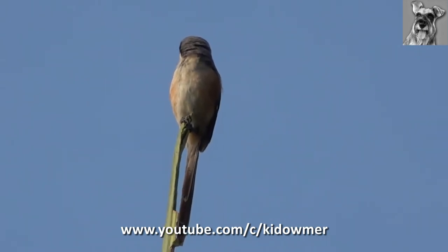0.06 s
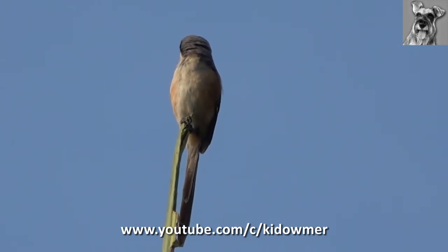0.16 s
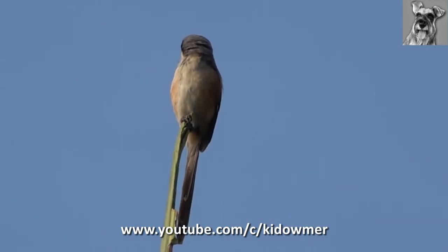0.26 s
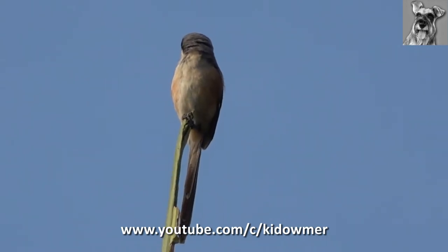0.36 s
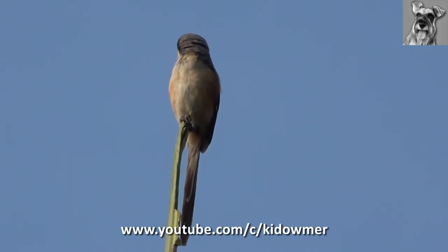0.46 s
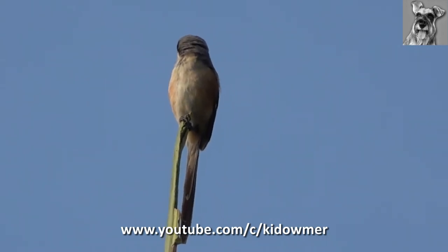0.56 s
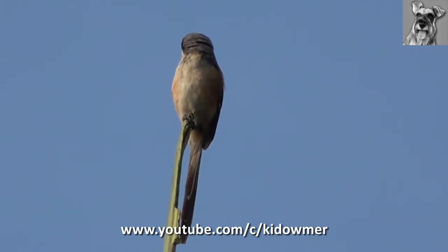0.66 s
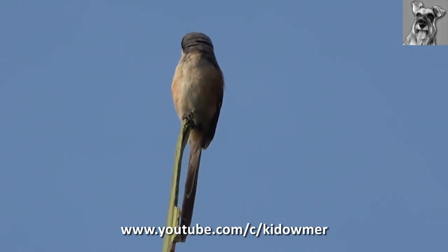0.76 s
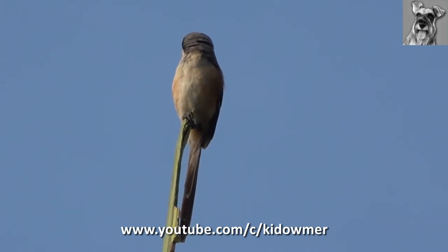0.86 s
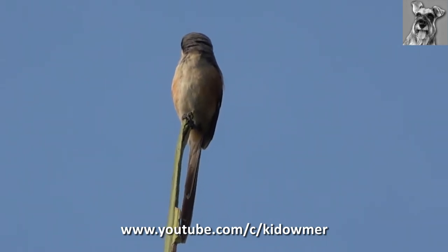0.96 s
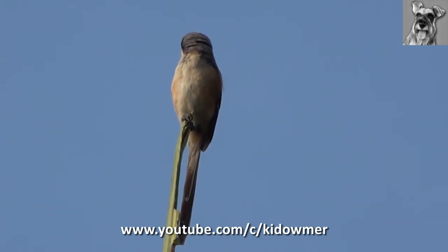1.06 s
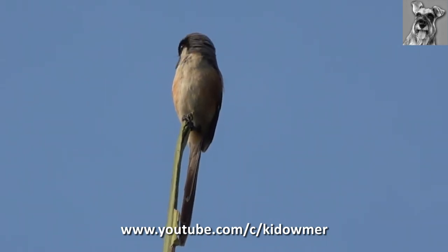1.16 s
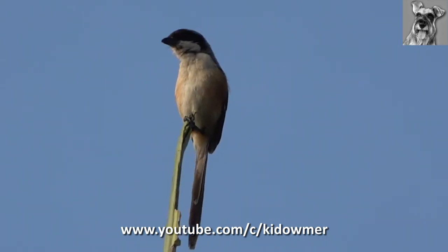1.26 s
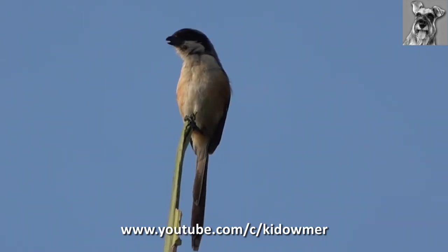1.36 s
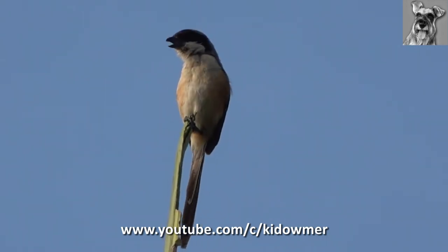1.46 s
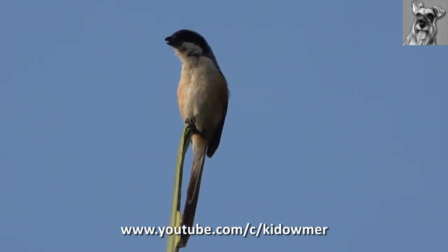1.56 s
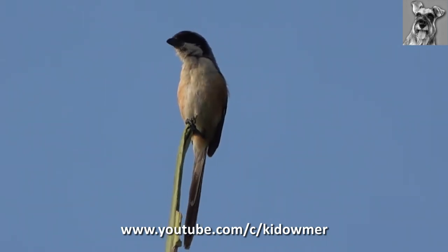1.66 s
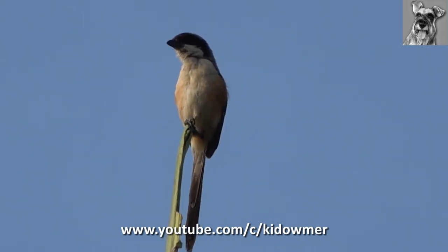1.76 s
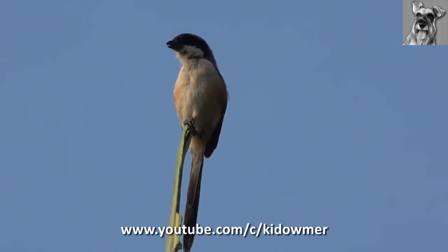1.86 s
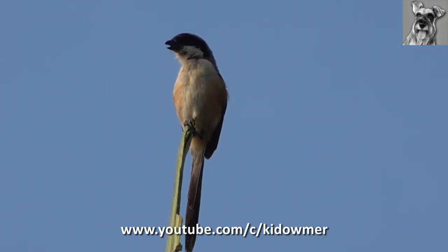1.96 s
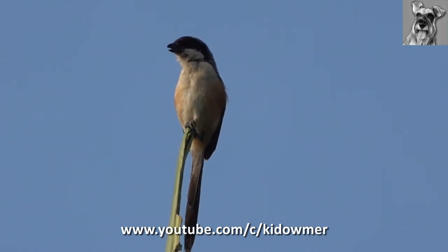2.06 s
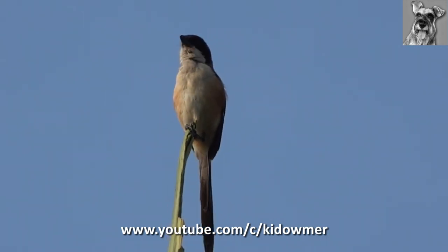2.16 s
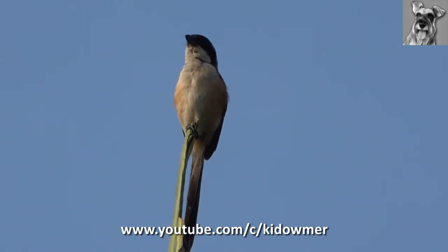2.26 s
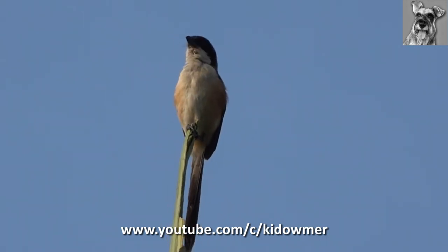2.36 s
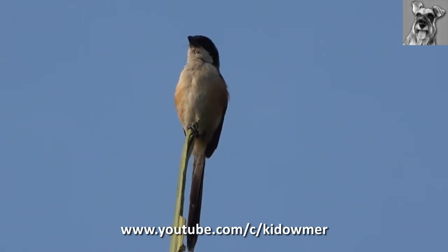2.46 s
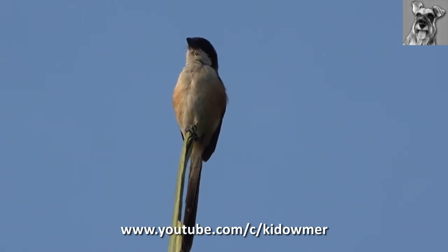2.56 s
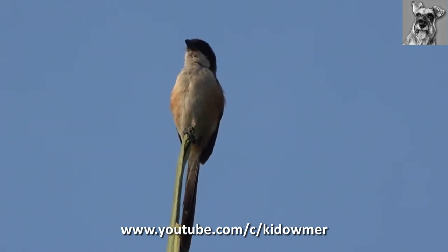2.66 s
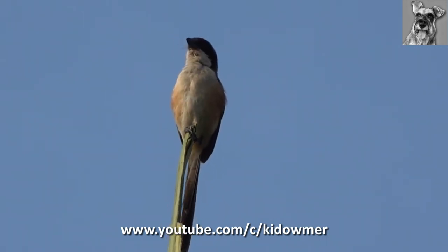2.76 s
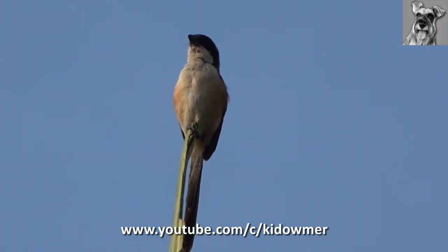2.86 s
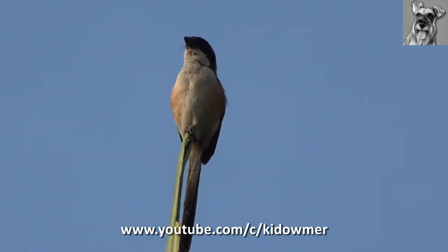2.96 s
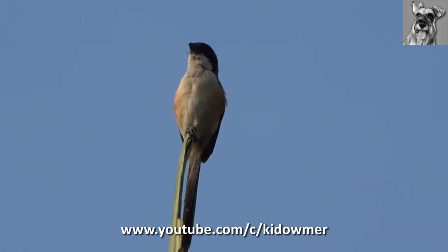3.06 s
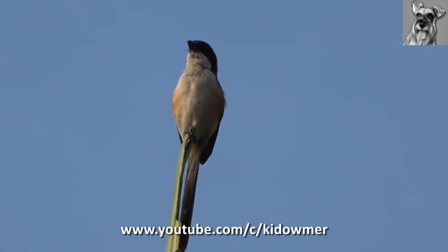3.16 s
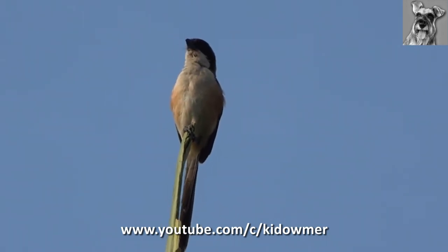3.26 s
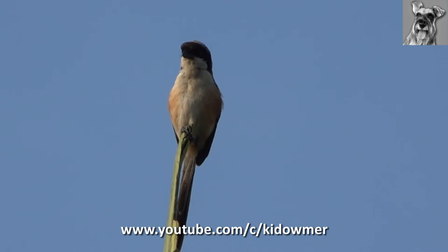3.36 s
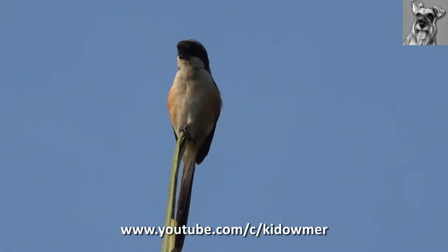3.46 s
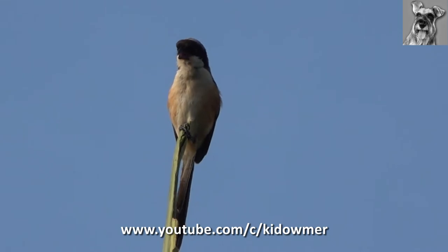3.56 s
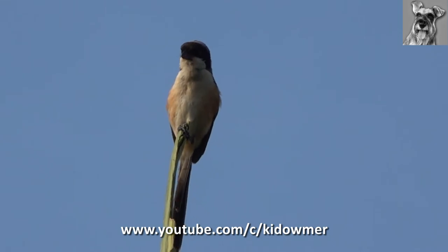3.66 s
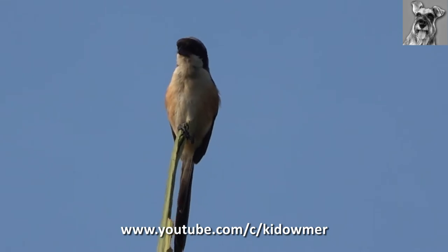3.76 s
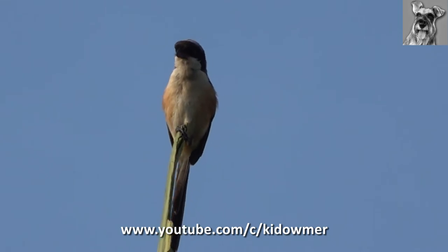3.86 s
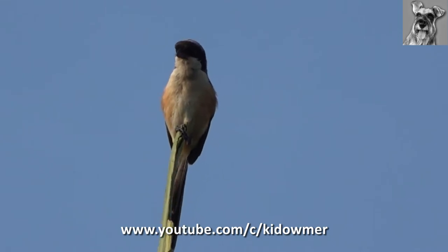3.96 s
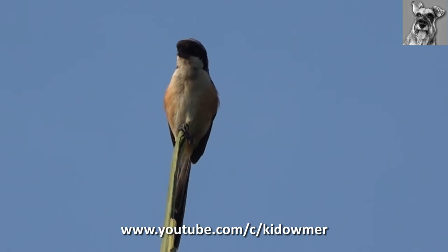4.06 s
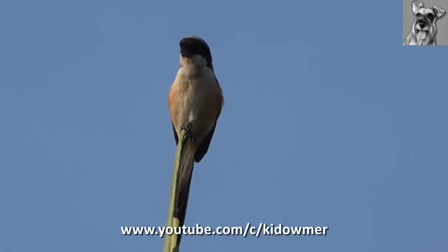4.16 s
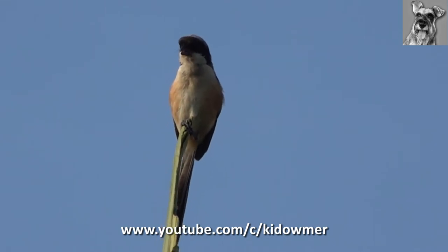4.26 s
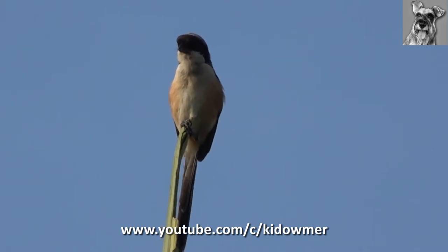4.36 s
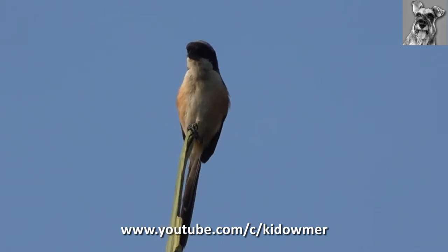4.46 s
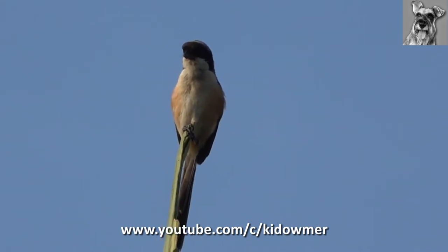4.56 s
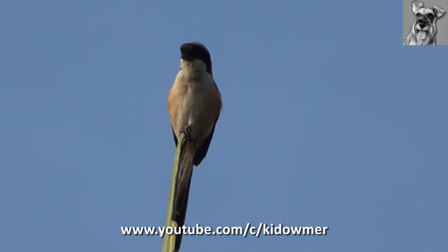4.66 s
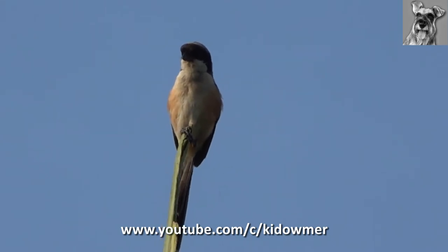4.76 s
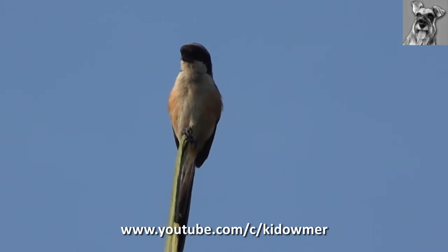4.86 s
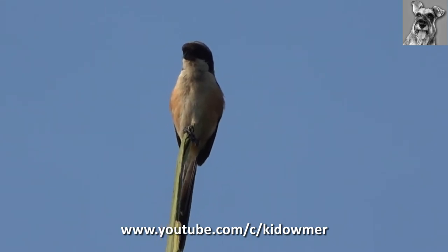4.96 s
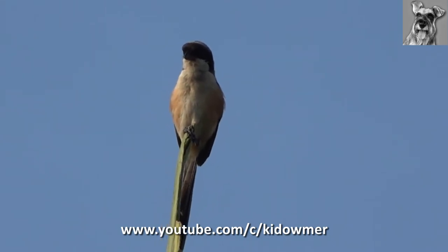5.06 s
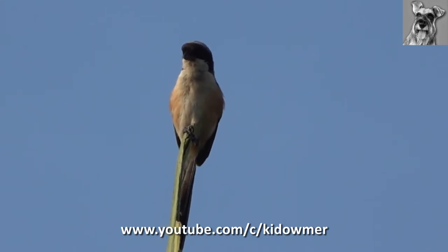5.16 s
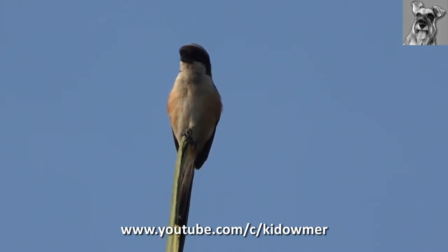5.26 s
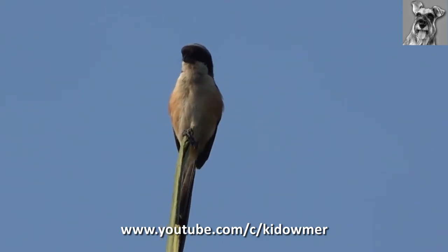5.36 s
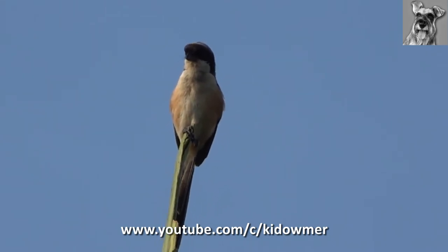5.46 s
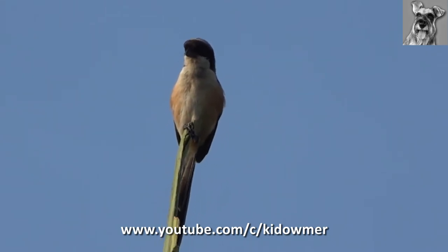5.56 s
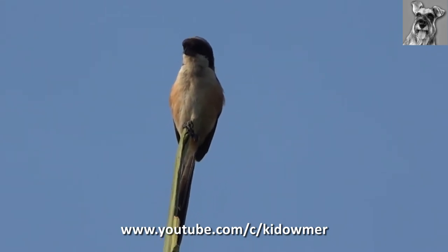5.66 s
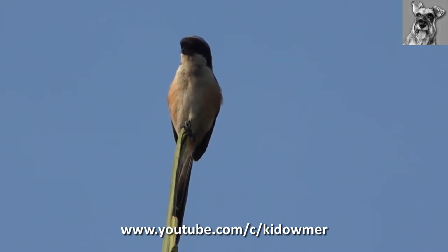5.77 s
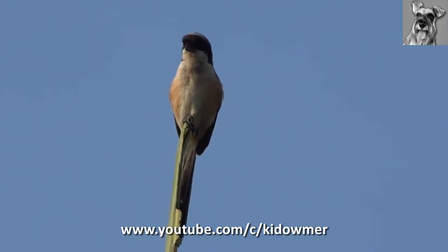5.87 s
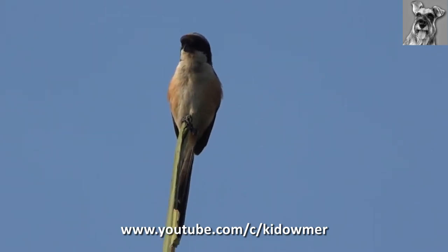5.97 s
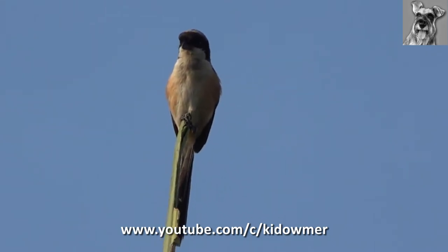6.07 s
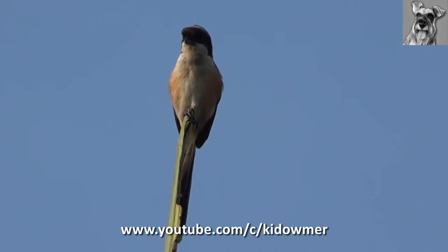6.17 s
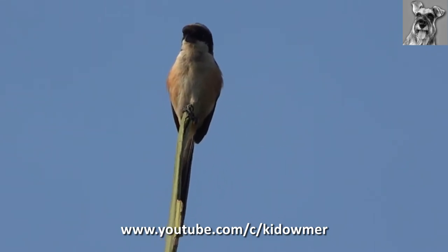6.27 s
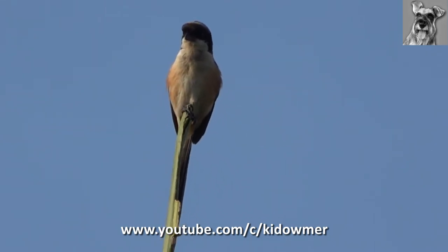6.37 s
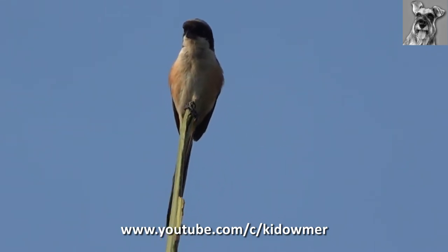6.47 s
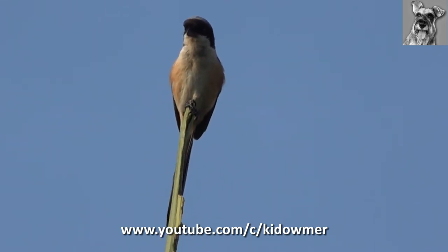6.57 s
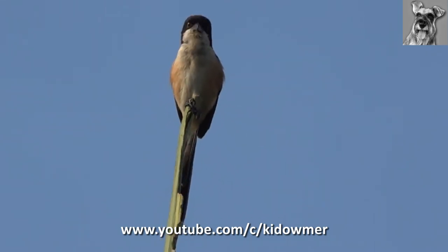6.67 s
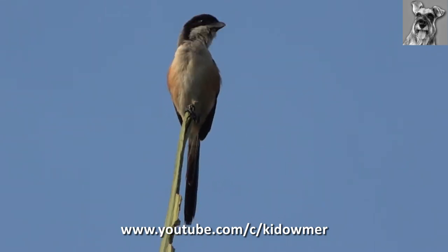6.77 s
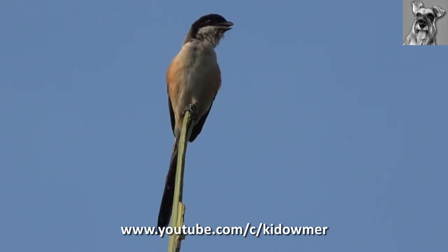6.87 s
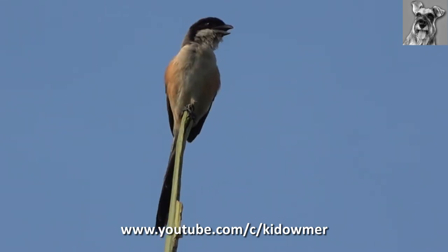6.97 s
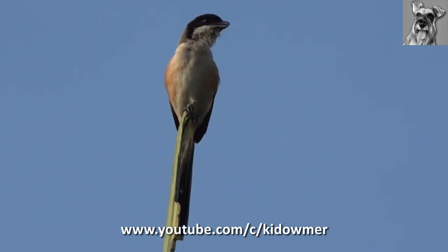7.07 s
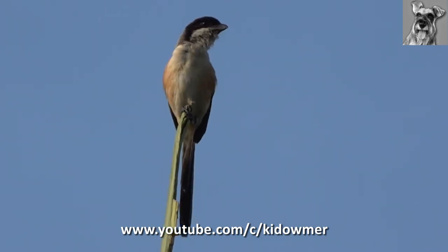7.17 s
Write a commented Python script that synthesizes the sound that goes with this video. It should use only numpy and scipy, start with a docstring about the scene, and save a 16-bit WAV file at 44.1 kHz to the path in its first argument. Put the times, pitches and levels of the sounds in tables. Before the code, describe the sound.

A perched shrike calls five times in a hoarse, scratchy voice: a pair, a second pair, then one last call near the end. It stands out clearly in front of the microphone, with a soft scatter of echoes from the trees. Behind it runs an unbroken, high cicada drone, with faint trills and chirps from distant small birds and a soft wash of far-off traffic.

```python
"""Cicadas drone steadily in the trees over a faint hiss and the low hush of distant traffic.
Small far voices trill and chirp; then a shrike on a high perch gives five harsh, rasping calls,
two pairs and a single one. The drone is resonance: bursts of tymbal clicks ring hollow bodies.
The far voices are frequency-modulated tones. The shrike's voice and breath are both chopped by
a fast flutter, and the foliage scatters every bird's sound into echoes."""
import sys
import numpy as np
from scipy import signal
from scipy.fft import rfft, irfft
from scipy.io import wavfile

SR = 44100
rng = np.random.default_rng(int(sys.argv[2]) if len(sys.argv) > 2 else 0)


def store_pcm(level_fs):
    """Save levels as 16-bit WAV."""
    pcm = np.round(np.clip(level_fs, -1, 1) * 32767).astype(np.int16)
    wavfile.write(sys.argv[1], SR, np.atleast_2d(pcm).T)


N = 318843
FREQS = np.fft.rfftfreq(N, 1 / SR)

# cicada bands: (resonance [Hz], width [Hz], level [dB], burst rate [Hz], pulsing depth [0-1])
CICADAS = [(10620, 970, -46.5, 133.3, 0.21), (10820, 1010, -47, 130, 0.01), (9384, 570, -55.5, 82, 0.15),
           (6573, 503, -62.5, 62, 0.24), (4667, 460, -68, 78, 0.45)]
# spectra of traffic hush, low rumble and high hiss: (frequency [Hz], relative density [dB])
HUSH_SPECTRUM = [(100, -32), (260, -18), (330, -12), (440, -10), (600, -4.5), (800, -1), (1000, .5),
                 (1300, -5), (1600, -10), (2100, -19.5), (3100, -34), (5000, -84)]
RUMBLE_SPECTRUM = [(15, -36), (40, -20), (60, -6.5), (95, 0.5), (160, 0), (210, -6), (300, -24), (600, -70)]
HISS_SPECTRUM = [(1500, -5), (2400, 0.5), (4000, -1.5), (5600, -8.5), (7900, -16.5), (9500, 14.5),
                 (12200, 4), (13000, -19), (13900, -17), (15000, -42)]
# slow drift of the rumble: (time [s], level [dB])
RUMBLE_LEVELS = [(0, -71), (1.25, -67.3), (2.4, -71), (5, -68), (5.9, -71.5), (7.0, -67.5)]
# likeness of the background at left and right: (frequency [Hz], coherence [0-1])
COHERENCE = [(130, 0.9), (290, .98), (640, .96), (1410, .96), (3100, 0.8), (6820, 0.92), (11000, 0.96),
             (13000, 1)]
# balance of the background: (frequency [Hz], left minus right [dB])
BALANCE = [(300, 0), (640, 0), (1400, 1.3), (6800, 1.5), (11000, 1.45), (13000, -0.5)]
# phase of the background: (frequency [Hz], lead of the left [rad])
PHASE_LEAD = [(5000, 0.0071), (10500, -.17), (13000, 0)]
# a lower and a higher far singer: (start [s], end [s], centre [Hz], reference level [dB])
TRILLS = [(.3, .89, 4605, -60.5), (.62, 1.042, 4830, -59), (1.65, 2.0, 4860, -56), (2.75, 3.17, 4550, -62),
          (2.8, 3.151, 4920, -59), (3.7, 4.137, 4880, -60), (3.85, 4.203, 4570, -56),
          (4.55, 5.167, 4830, -58), (4.95, 5.33, 4550, -59), (5.72, 6.173, 4850, -58),
          (5.9, 6.344, 4580, -58), (6.95, 7.295, 4780, -55)]
# far chirps: (start [s], length [s], first pitch [Hz], last pitch [Hz], peak level [dB])
CHIRPS = [(.945, .035, 3850, 3400, -66), (1.004, .23, 4140, 3830, -67.5), (1.188, 0.054, 3500, 3230, -66),
          (1.257, 0.036, 3430, 3880, -61.5), (1.73, 0.031, 3900, 4250, -59), (2.16, 0.037, 4100, 3710, -59),
          (5.485, .04, 4100, 3800, -64), (5.805, 0.046, 4100, 3500, -61), (5.876, .025, 2900, 3100, -65),
          (5.892, .028, 3660, 3420, -59.5)]
# shrike calls: (start [s], length [s], effort [dB], nominal top of the fourth harmonic [Hz],
# third harmonic [dB re effort], fourth harmonic [dB re effort], split onset [s], split length [s])
SHRIKE_CALLS = [ (1.375, 0.24, -39, 4534, -1.5, -6.5, 0.057, .05),
                (1.873, 0.24, -40, 4530, -3, -6, 0.11, 0.12), (3.456, .233, -40, 4510, -5, -5.5, 0.15, .12),
                (4.112, 0.22, -40, 4520, -6, -6.5, 0.116, 0.11),
                (6.868, .237, -39.5, 4500, -4.5, -2.5, 0.11, .12), ]
# weak partials of the voice: (frequency [multiple of the pitch], level [dB re effort])
OVERTONES = [(2.03, -27), (6.12, -21), (7.26, -26), (12.2, -39)]
# partials that grow as the voice splits into strong and weak cycles:
# (frequency [multiple of the pitch], relative level [dB])
SPLIT_PARTIALS = [(2.68, -5.5), (3.418, -3.5), (4.467, -3)]
# spectrum of the rasping breath: (frequency [Hz], relative density [dB])
RASP_SPECTRUM = [(1000, -26), (1750, -13), (2150, -11.5), (2700, -2.5), (3300, -3), (4100, -4.5),
                 (5000, -6.5), (5500, -8.5), (7000, -9.5), (7700, -9.5), (9200, -4), (12400, -20.5),
                 (13300, -7.5), (15700, -23)]
# decay of scatter from near leaves and of echo from the trees: (frequency [Hz], time to fall 60 dB [s])
LEAF_DECAY = [(2000, 0.48), (14000, 0.43)]
TREE_DECAY = [(1500, 0.56), (4000, 1), (8000, 1), (14000, 0.49)]


def gain_of(db):
    """Amplitude grows tenfold with every 20 decibels."""
    return 10 ** (np.asarray(db) / 20)


def unit_rms(x):
    """Normalisation to unit mean power."""
    return x / np.sqrt(np.mean(np.abs(x) ** 2) + 1e-20)


def read(table, hz):
    """Interpolation on a log-frequency axis."""
    f, value = np.transpose(table)
    return np.interp(np.log(hz + 1), np.log(f + 1), value)


def add(mix, start, sound):
    """Superposition: a sound joins the mix at its start time in seconds."""
    part = mix[max(round(start * SR), 0):][:len(sound)]
    part += sound[:len(part)]


def wander(size, rate_hz):
    """Low-passed noise: a smooth random fluctuation of rms 1."""
    f = np.fft.rfftfreq(size, 1 / SR)
    lowpass = np.exp(-.5 * (f / rate_hz) ** 2) * (f > 0)
    return unit_rms(irfft(rfft(rng.standard_normal(size)) * lowpass, size))


def coloured(x, spectrum):
    """Linear filtering imposes a tabulated spectrum; the result has rms 1."""
    size = x.shape[-1]
    response = gain_of(read(spectrum, np.fft.rfftfreq(size, 1 / SR)))
    return unit_rms(irfft(rfft(x) * response, size))


def cicada(hz, width, db, burst_hz, pulsing):
    """Resonance: bursts of tymbal clicks ring a hollow body, and many animals blur into one band."""
    beat = 2 * np.pi * np.cumsum(burst_hz * (1 + .0084 * wander(N, 3.5))) / SR
    bursts = rng.standard_normal((2, N)) * (1 + pulsing * np.cos(beat))
    body = (1 + ((FREQS - hz) / width) ** 2) ** -2.2
    return gain_of(db + .25 * wander(N, 5)) * unit_rms(irfft(rfft(bursts) * body, N))


def traffic(hush_db=-55.5):
    """Incoherent summation: distant traffic and air merge into a low rumble and a hush."""
    rumble_db = np.interp(np.arange(N) / SR, *np.transpose(RUMBLE_LEVELS))
    rumble = gain_of(rumble_db) * coloured(rng.standard_normal(N), RUMBLE_SPECTRUM)
    drift = gain_of(hush_db + .21 * wander(N, .95))
    return rumble, drift * coloured(rng.standard_normal((2, N)), HUSH_SPECTRUM)


def high_hiss(db=-62):
    """Leaves and far insects add incoherently to a steady, faint noise."""
    return gain_of(db) * coloured(rng.standard_normal((2, N)), HISS_SPECTRUM)


def spread(pair):
    """Partial coherence: two unrelated signals become one wide source at two close microphones."""
    left, unrelated = rfft(pair)
    coherence = np.clip(read(COHERENCE, FREQS), 0, 1)
    right = coherence * left + np.sqrt(1 - coherence ** 2) * unrelated
    tilt = gain_of(read(BALANCE, FREQS) / 2) * np.exp(.5j * read(PHASE_LEAD, FREQS))
    return irfft([left * tilt, right / tilt], N)


def trill(start, end, hz, reference_db, rate_hz=23.3, sweep_hz=248, rise_db=9):
    """Frequency modulation: a thin whistle swings ever wider and louder up to its midpoint."""
    t = np.arange(0, end - start, 1 / SR)
    grown = np.minimum(2 * t / (end - start), 1)
    swing = np.cos(2 * np.pi * rate_hz * (t - t[-1] + .02) + .21 * wander(len(t), 8.8))
    pitch = hz + sweep_hz * (.4 + .6 * grown) * swing + 75 * wander(len(t), 300)
    accent = .45 + swing ** 2  # loudest at the turns
    whistle = unit_rms(accent * np.sin(2 * np.pi * np.cumsum(pitch) / SR))
    level_db = reference_db - rise_db * (2 - grown)  # settles rise_db below the reference
    return gain_of(level_db) * whistle * signal.windows.tukey(len(t), .1)


def chirp(length, first_hz, last_hz, db):
    """A linear glide: frequency jitter makes a far bird's slurred note slightly hoarse."""
    size = int(length * SR)
    pitch = np.linspace(first_hz, last_hz, size) + 140 * wander(size, 400)
    return gain_of(db) * np.sin(2 * np.pi * np.cumsum(pitch) / SR) * signal.windows.tukey(size, .7)


def placed(x, lead_s=3e-6, louder_db=.4):
    """Path difference: a source just left of centre reaches that side sooner and louder."""
    tilt = gain_of(louder_db / 2) * np.exp(1j * np.pi * FREQS * lead_s)
    return irfft(rfft(x) * np.array([tilt, 1 / tilt]), N)


def foliage(x, decay, dull_hz, echoes_per_s=2500):
    """Scattering: foliage returns many small echoes, the highest treble dying first."""
    taps = rng.standard_normal((2, SR)) * (rng.random((2, SR)) < echoes_per_s / SR)
    taps[1] = .8 * taps[0] + .6 * taps[1]  # the two sides are partly alike
    hz, t, spectra = signal.stft(taps, SR, nperseg=256)
    fade = gain_of(-60 * t / read(decay, hz)[:, None]) / (1 + (hz[:, None] / dull_hz) ** 2)
    tail = signal.istft(spectra * fade, SR, nperseg=256)[1]
    return signal.fftconvolve(x[None], tail / np.linalg.norm(tail[0]), axes=1)[:, :N]


def shrike_gesture(length, effort_db, top_hz, third_db, fourth_db, split_at, split_for):
    """Envelopes of one call: effort, pitch and the levels of the partials, as the voice splits."""
    attack_s, release_s, firming_s, slack_s, splitting_s = .047, .018, .042, .04, .043
    arch_hz, split_lift_hz = 80.1, 80
    t = np.arange(0, length, 1 / SR)
    remaining = length - t
    effort = effort_db - 2 * np.maximum(1 - t / attack_s, 0) - 4 * np.maximum(1 - remaining / release_s, 0)
    # the harmonics come in late out of the breathy start and weaken towards the end
    onset_db = -17.5 * np.exp(-t / firming_s)
    tone_db = onset_db - 6.5 * np.maximum(1 - remaining / slack_s, 0)
    hoarse = np.clip(.5 + np.minimum(t - split_at, split_at + split_for - t) / splitting_s, 0, 1)
    fourth_hz = top_hz + arch_hz * (np.sin(np.pi * t / length) - 1) + split_lift_hz * hoarse
    # splitting weakens the main harmonics and strengthens the partials around them
    third = third_db + tone_db - 2.5 * hoarse
    fourth = fourth_db + tone_db - .5 * hoarse
    split = (onset_db - 14) * (1 - hoarse) - 6.5 * hoarse
    return t, effort, fourth_hz / 4, third, fourth, split


def shrike_rasp(t, opening_s, db=-6, buzz_hz=635):
    """Comb filtering: breath noise partly repeats each buzz cycle, which ribs its spectrum."""
    air = rng.standard_normal(len(t))
    air = air + .45 * np.interp(t - 1 / buzz_hz, t, air)
    bright = gain_of(db) * coloured(air, RASP_SPECTRUM)
    dull = signal.filtfilt(*signal.butter(2, 3800, fs=SR), bright)
    return dull + np.minimum(t / opening_s, 1) * (bright - dull)  # brightens as the beak opens


def shrike(call, flutter_hz=110, swing_hz=60, opening_s=.072):
    """Amplitude modulation: a fast flutter chops an unsteady voice and its rasp into a harsh note."""
    t, effort_db, pitch, third_db, fourth_db, split_db = shrike_gesture(*call)
    size = len(t)
    ragged = np.minimum(2 * gain_of(split_db), 1)  # grows as the voice splits
    beat = 2 * np.pi * np.cumsum(flutter_hz * (1 + .035 * wander(size, 30))) / SR
    beat += .5 * ragged * wander(size, 90)
    tremor = wander(size, 107)

    def flutter(depth, lag=0):
        """Periodic gain, with depth in nepers and lag in radians."""
        return unit_rms(np.exp(depth * np.cos(beat - lag)))

    def partial(multiple):
        """Jitter and shimmer roughen a sinusoid whose frequency swings with the flutter."""
        jitter_hz = (28 + 50 * ragged) * .7 * (tremor + wander(size, 130))
        shimmer = 1 + .29 * ragged * wander(size, 400)
        hz = multiple * pitch + swing_hz * np.cos(beat) + jitter_hz
        return unit_rms(shimmer * np.sin(2 * np.pi * np.cumsum(hz) / SR))

    # the energy swings between the third and fourth harmonics within each flutter
    voice = gain_of(third_db) * partial(3.04) * flutter(.65)
    voice += gain_of(fourth_db) * partial(4.03) * flutter(.4, lag=2.8)
    weak = sum(gain_of(db) * partial(k) for k, db in OVERTONES)
    weak += gain_of(split_db) * sum(gain_of(db) * partial(k) for k, db in SPLIT_PARTIALS)
    rasp = shrike_rasp(t, opening_s)
    swell = gain_of(effort_db) * signal.windows.tukey(size, .08)
    swell *= np.sqrt(np.minimum(2 * t / opening_s, 1))
    chop = flutter(.28, lag=.68)
    return swell * (voice + weak * chop), swell * rasp * chop


def scene(shrike_echo_db=-18, shrike_scatter_db=-13, far_echo_db=-15, far_scatter_db=-8):
    """Superposition of the steady background, the birds' direct sound and their echoes."""
    rumble, hush = traffic()
    hiss = high_hiss()
    drone = sum(cicada(*band) for band in CICADAS)
    voice, rasp, far = np.zeros((3, N))
    for start, *call in SHRIKE_CALLS:
        tone, air = shrike(call)
        add(voice, start, tone)
        add(rasp, start, air)
    for start, *note in TRILLS:
        add(far, start, trill(start, *note))
    for start, *note in CHIRPS:
        add(far, start, chirp(*note))
    thrown = rasp + .3 * voice  # the echoes are hoarser than the call
    to_leaves = gain_of(shrike_scatter_db) * thrown + gain_of(far_scatter_db) * far
    to_trees = gain_of(shrike_echo_db) * thrown + gain_of(far_echo_db) * far
    scatter = foliage(to_leaves, LEAF_DECAY, dull_hz=16000)
    echo = foliage(to_trees, TREE_DECAY, dull_hz=7100)
    return placed(voice + rasp + far) + scatter + echo + rumble + spread(hush + hiss + drone)


def record(dry, edge_hz=15750):
    """Band limiting: the recorder's steep low-pass filter removes the highest treble."""
    lowpass = signal.firwin(511, edge_hz, window=("kaiser", 9), fs=SR)
    return signal.oaconvolve(dry, lowpass[None], "same")


dry = scene()
out = record(dry)
store_pcm(out)
```